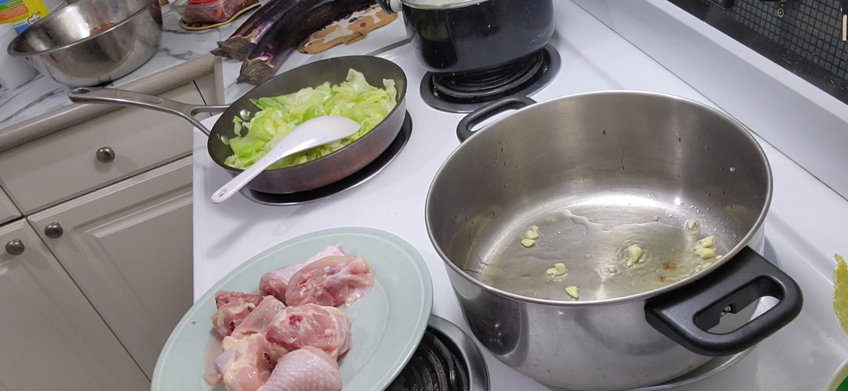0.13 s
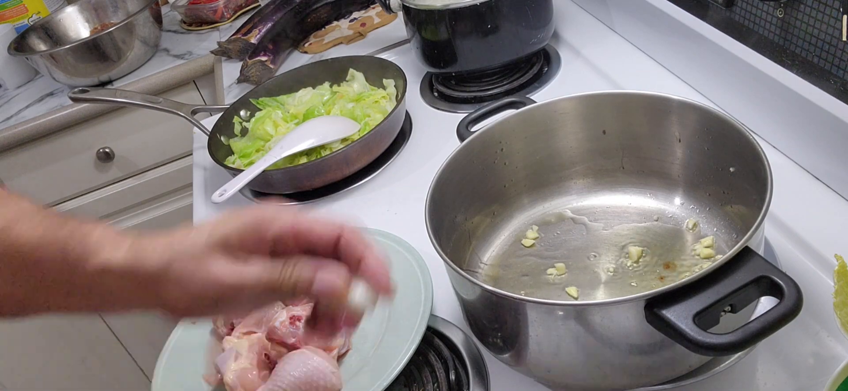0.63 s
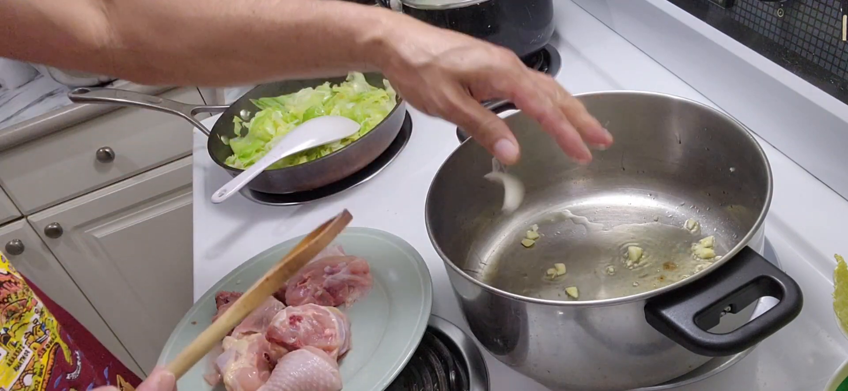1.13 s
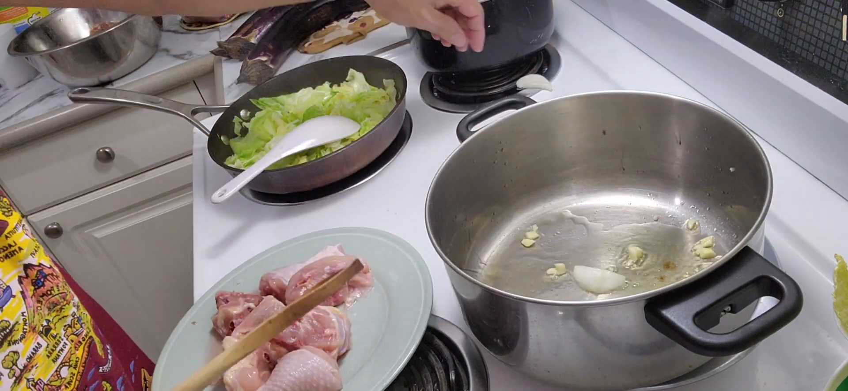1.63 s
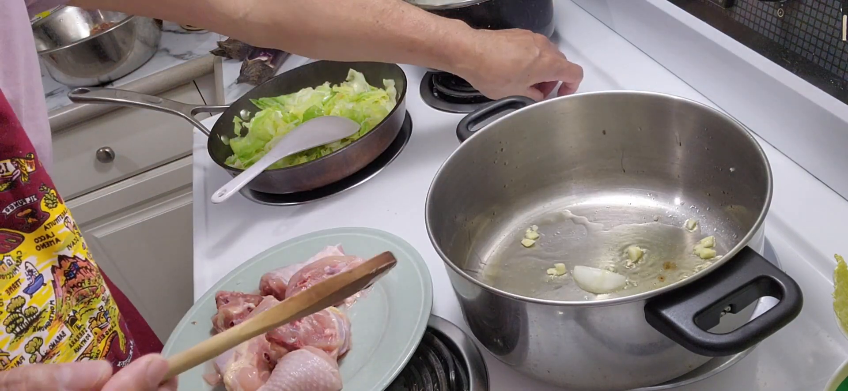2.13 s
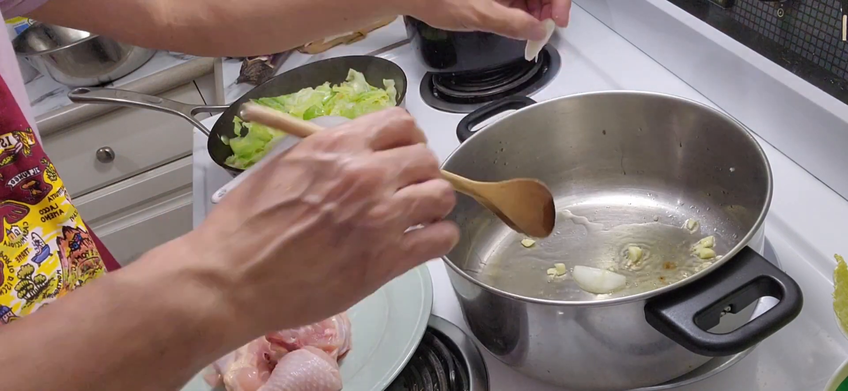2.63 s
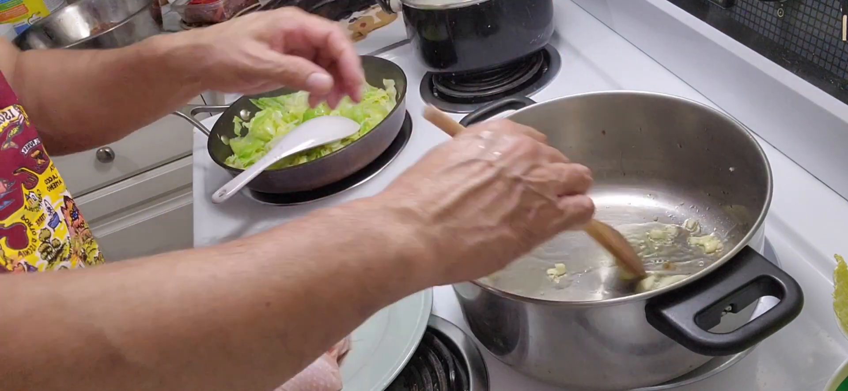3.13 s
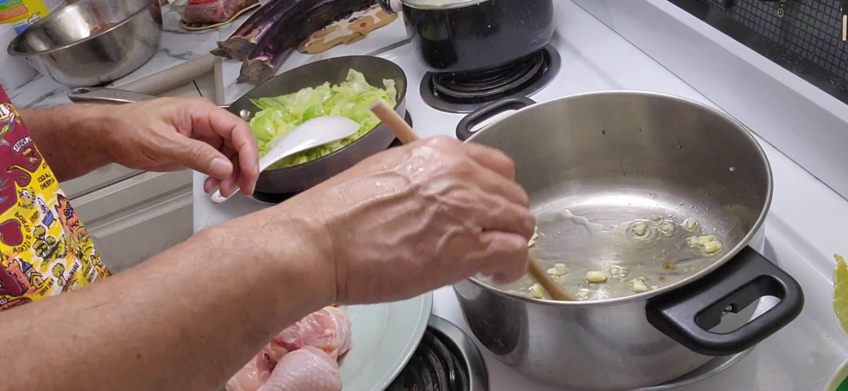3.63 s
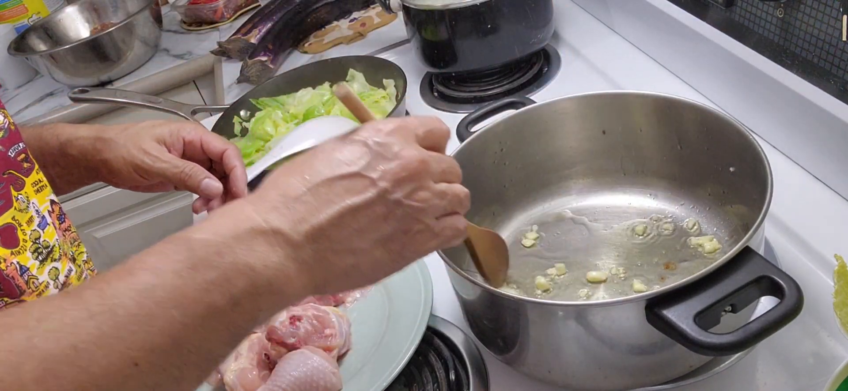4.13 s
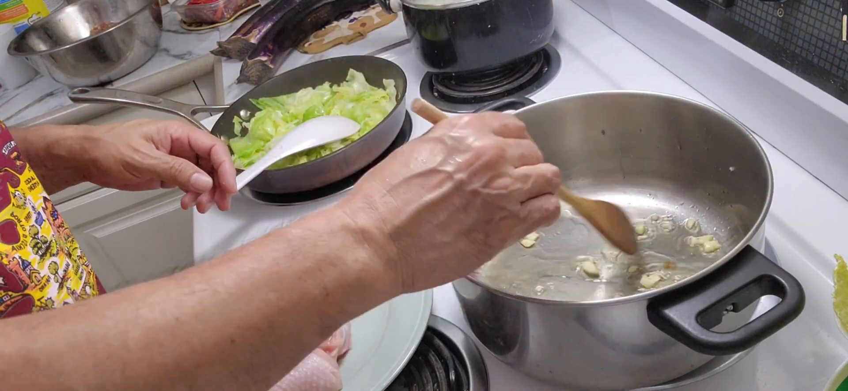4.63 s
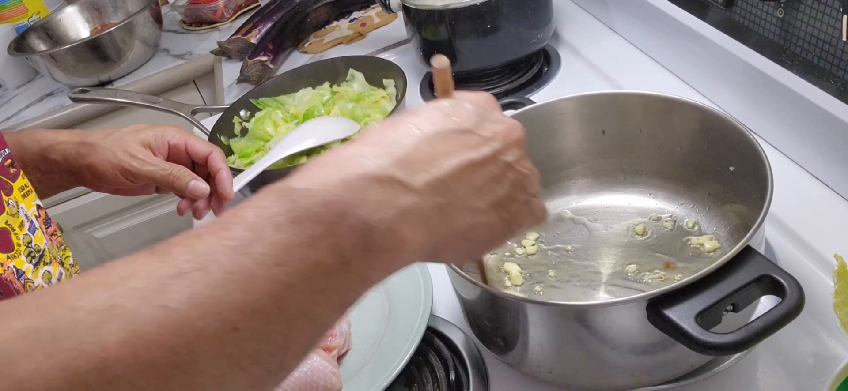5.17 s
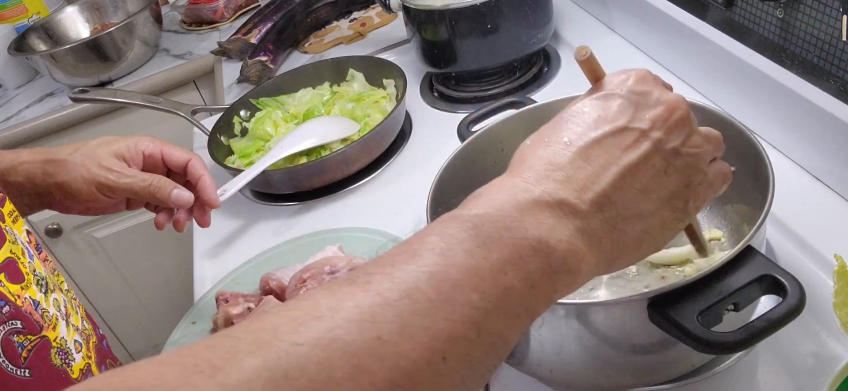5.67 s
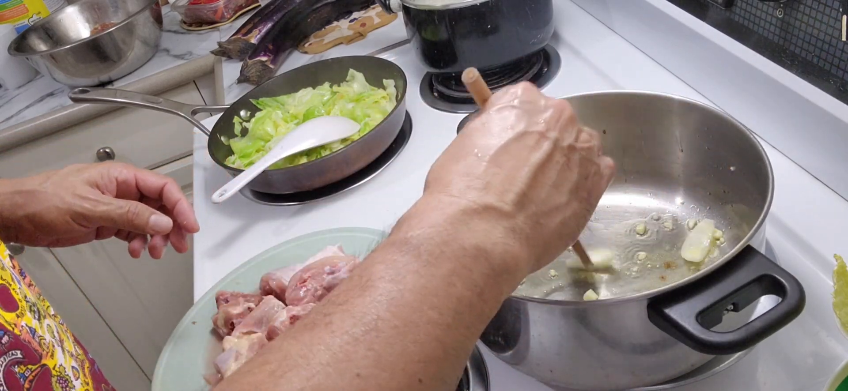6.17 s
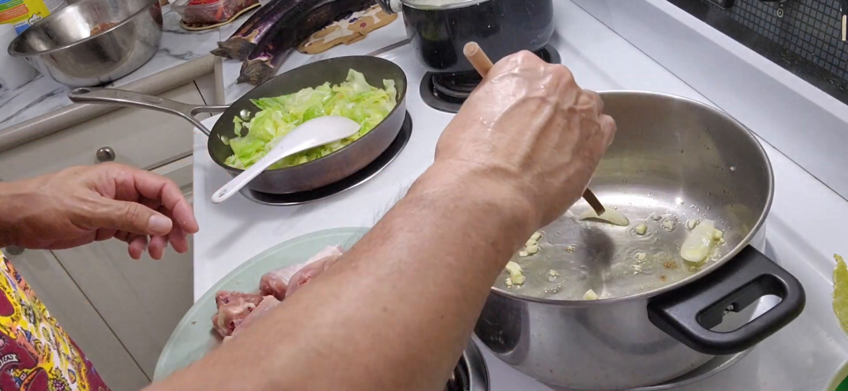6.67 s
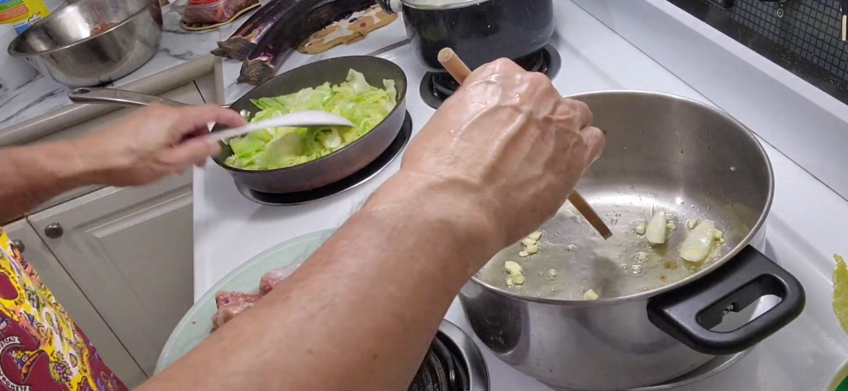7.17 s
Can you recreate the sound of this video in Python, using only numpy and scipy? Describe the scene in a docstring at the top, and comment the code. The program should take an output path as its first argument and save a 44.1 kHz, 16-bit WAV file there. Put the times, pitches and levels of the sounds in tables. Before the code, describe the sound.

Garlic sizzles in hot oil, thinly at first, with water drops cracking and small bubbles pinging. Soft low thuds open the scene. The fizz then grows dense and bright, and a faint low engine drone rises outside and stops. Irregular wooden spoon taps and scrapes follow on the hollow metal pot bottom. Close, dry indoor sound with slight room reflections and steady low hum.

```python
"""Chopped garlic fries in hot oil in a wide steel pot, over the kitchen's rumble and a wavering motor hum.
A few dull bumps ring low at the start; drops of water burst throughout with a crack and a short splutter,
and a few early bubbles sing. The fizz, shaped noise, then grows, and an engine passes outside as two sines.
From 3 s a wooden spoon knocks and scrapes the pot floor, whose damped modes ring briefly, and a few more
dull bumps follow."""
import sys
import numpy as np
from scipy import signal
from scipy.fft import rfft, irfft, next_fast_len
from scipy.io import wavfile

SR = 44100
rng = np.random.default_rng(int(sys.argv[2]) if len(sys.argv) > 2 else 0)


def persist_wave(psi):
    """Save psi, clipped to +-1, as 16-bit WAV."""
    counts = np.round(np.clip(psi, -1, 1) * 32767).astype(np.int16)
    wavfile.write(sys.argv[1], SR, np.atleast_2d(counts).T)


def invert_db(x):
    """Field ratio 10**(x/20) for x, a level in decibels (scalar or array-like)."""
    u = np.asarray(x, float) / 20
    return 10 ** u


N = 321489

# Blows of the spoon on the pot: (time [s], blow level [dB], then against the blow: wood knock [dB],
# second ring [dB], ring near 2200 Hz [dB])
SPOON_TAPS = [(2.9957, -30, -1, -2, -1), (3.136, -15, -0.5, -3.5, -15), (3.146, -18.5, -1, -5, -20),
              (3.201, -48, -5, 15, -4), (3.4004, -6.5, -11, 4, 1), (3.428, -34.5, 15, 20.5, -7),
              (3.7029, -21.5, -7, 1.5, 0), (3.7381, -24.5, 3.5, -7, -3), (3.8593, -22, -6, -7, -6),
              (3.9988, -43.5, 4, 15.5, 9), (4.258, -1.5, -21, -1.5, -17), (4.4283, -30, -3, 10, 7),
              (4.6005, -17.5, -11.5, -6, -17), (4.873, -17.5, -0.5, -2.5, -10),
              (5.1215, -32.5, -17, 2, 11.5), (5.387, -44, -10, -9, 20), (5.258, -21.5, -10, -24, -18),
              (5.3383, -19, -16, -2.5, -2), (5.3595, -22.5, -6, -17, -16), (5.546, -4.5, -11, -3, -10.5),
              (5.6232, -18, -10, -12, -9), (5.887, -22, -6, 6, -8), (5.901, -14.5, -5, -10, -16),
              (6.333, -4.5, -10.5, -7, -11), (6.755, -34.5, 5, 9, 2), (6.863, -6.5, -14, 1.5, -6),
              (7.131, -31, -17, -3, -6)]
LEFT_LATE_MS = .04   # mean delay of the left side


def rms_one(x):
    """Normalise to unit root-mean-square value."""
    return x / np.sqrt(np.mean(x ** 2) + 1e-20)


def in_time(rows):
    """Linear interpolation of each column of a time curve at every sample."""
    s, *columns = np.transpose(rows)
    return [np.interp(np.arange(N) / SR, s, c) for c in columns]


def at_hz(points, hz):
    """Interpolation of a spectrum on a logarithmic frequency axis."""
    return np.interp(np.log(hz), np.log(np.array(points)[:, 0]), np.array(points)[:, 1])


def drift(rate):
    """Slow random modulation of rms 1: white noise through two equal low-pass poles at rate [Hz]."""
    r = np.exp(-80 * np.pi * rate / SR)   # one step is 40 samples
    noise = rng.standard_normal(N // 40 + 2002)
    slow = signal.lfilter([1], [1, -2 * r, r * r], noise)[2000:]   # without the settling of the filter
    return np.interp(np.arange(N) / 40, np.arange(len(slow)), rms_one(slow))


def clicks(times, sizes):
    """Impulse train: single samples of given heights."""
    out = np.full(N, 1e-18)
    np.add.at(out, (np.asarray(times) * SR).astype(int), sizes)
    return out


def fade(x, t60):
    """Exponential decay: every impulse leaves a tail that falls by 60 dB in t60 [s]."""
    return signal.lfilter([1], [1, -invert_db(-60 / (t60 * SR))], x)


def ring(x, hz, t60):
    """Damped resonator: a unit impulse excites a decaying sine of initial height 1."""
    r = invert_db(-60 / (t60 * SR))
    w = 2 * np.pi * hz / SR
    return signal.lfilter([0, np.sin(w)], [1, -2 * r * np.cos(w), r * r], x)


def later(x, ms):
    """Propagation delay by interpolated reading."""
    return np.interp(np.arange(N) - ms * SR / 1000, np.arange(N), x)


def bank(edges, source):
    """Filter-bank synthesis: source(hz) gives noise height and ticks; each band is partly correlated in stereo."""
    # Stereo likeness: (frequency [Hz], left-right correlation)
    likeness_curve = [(60, .99), (120, .97), (200, .76), (380, .78), (700, .5), (1400, .3), (4400, .15),
                      (8000, 0)]
    # Stereo balance: (frequency [Hz], left over right [dB])
    balance_curve = [(60, 3.5), (150, -1), (380, 2.5), (950, 2.5), (2380, 1), (5980, 2.5), (15000, 3)]
    out, white = 0, rng.standard_normal((2, 2, N))
    for k, (low, high) in enumerate(zip(edges, edges[1:])):
        hz = np.sqrt(low * high)
        height, ticks = source(hz)
        sos = signal.butter(2, [low, high], "band", fs=SR, output="sos")
        alike = np.clip(at_hz(likeness_curve, hz), -1, 1)
        mid, side = white[k % 2] * height
        pair = np.sqrt(1 + alike) * mid + np.sqrt(1 - alike) * side * [[1], [-1]]
        pair = pair + (-1) ** k * ticks
        balance = invert_db(at_hz(balance_curve, hz) * np.array([[.5], [-.5]]))
        out = out + signal.sosfilt(sos, pair) * balance
    return out


def kitchen_air():
    """Ambient noise: band-shaped rumble of the house plus motor-hum sines, modulated in frequency and level."""
    # Rumble level: (time [s], level [dB])
    room_levels = [(0.0, -40), (0.34, -46.5), (0.65, -46.5), (2.54, -45), (3.17, -45.5), (3.51, -46),
                   (7.29, -44.5)]
    # Rumble spectrum: (frequency [Hz], relative level [dB])
    rumble_spectrum = [(12, -36), (20, 5.5), (114, 0), (170, -10), (494, -14), (649, -79), (1050, -71),
                       (1170, -15), (1470, -44), (1810, -37), (2150, -21), (2540, -34), (3000, -22),
                       (3900, -52), (6600, -120)]
    # Motor hum: (frequency [Hz], level [dB])
    hum_lines = [(59.2, -48.5), (119, -51.5)]
    level_db, = in_time(room_levels)

    def band(hz):
        """Noise height of one rumble band under slow random modulation."""
        return invert_db(at_hz(rumble_spectrum, hz) + 1.5 * drift(4.0)), 0

    rumble = bank(np.geomspace(20, 3000, 15), band)
    waver = np.cumsum(1 + 0.012 * drift(2.46)) / SR   # time that runs unevenly
    hum = 0
    for hz, db in hum_lines:
        hum = hum + np.sqrt(2) * invert_db(db + 0.92 * drift(2.4)) * np.sin(2 * np.pi * hz * waver)
    return invert_db(level_db) * rms_one(rumble) + hum


def frying():
    """Superposition of countless bubbles: noise fizz, a patter of spits, and bursts with splutter and puff."""
    # Vigour of the fizz: (time [s], level [dB])
    fry_levels = [(0.0, -44.5), (1.13, -47), (1.4, -37.5), (1.56, -31), (2.25, -31.5), (2.66, -35.5),
                  (2.95, -26.5), (3.31, -32.5), (3.74, -25), (3.92, -30), (4.53, -30.5), (4.97, -34),
                  (5.55, -29), (6.06, -32), (6.23, -29.5), (6.54, -26), (6.98, -27), (7.29, -37)]
    # Colour of fizz, spits, splutter and puffs: (frequency [Hz], relative level [dB])
    fizz_spectrum = [(710, -51), (1200, 2.5), (1490, -45.5), (1890, -5), (2090, -7.5), (2620, -19),
                     (3220, -6.5), (4650, -5), (5470, -3), (7740, -2), (8440, -8), (15200, 2.5),
                     (16000, 2.5)]
    # Top octave against the fizz: (time [s], relative level [dB])
    top_levels = [(0.0, -3), (1.13, -5.5), (1.5, -6.5), (6.2, -4.5), (6.54, -2), (6.98, -4), (7.29, 1.5)]
    splutter_level_db, swell_s = -63, 0.006   # the splutter begins to swell just before the snap
    puff_level_db, puff_t60_s = -12.5, 0.046   # short puff of steam at each snap, against the snap
    (fizz_db,), (top_db,) = in_time(fry_levels), in_time(top_levels)
    s, snap_db, peak_db, bright_db, bubble_hz = cracks()
    spits = small_bursts(200, 4.4)
    spit_hz = 5500 * 2 ** (.7 * rng.standard_normal(N))   # each spit has its own colour
    lean_db = 1.0 * rng.standard_normal(N) * [[.5], [-.5]]
    spit_sides = spits * rng.choice([-1, 1], N) * invert_db(lean_db)
    surge_db = .8 * drift(10.0)
    fits = fade(small_bursts(300.0, 2.4), 0.005) + 1.6   # a splutter is a quick run of tiny bursts

    def band(hz):
        """Noise height and spit impulses in one band, by addition of powers."""
        top = np.clip(np.log2(hz / 6500) * 4.0, 0, 1)   # share of the top octave's own level
        fizz = invert_db(fizz_db + top * top_db + surge_db + 1.3 * drift(20.0))
        pitch_db = 5 * np.exp(-(np.log2(hz / bubble_hz) / 0.15) ** 2)   # each bubble favours its own pitch
        burst_db = splutter_level_db + peak_db + top * bright_db + pitch_db
        burst_db = burst_db + 2.0 * rng.standard_normal(len(s))
        splutter = fade(fade(clicks(s - swell_s, invert_db(burst_db)), 0.023), 0.2) * fits
        colour = np.exp(-(np.log2(hz / spit_hz) / .55) ** 2)
        spit_tails = invert_db(-6.0) * fade(spits * colour, 0.045)
        puff_db = snap_db + puff_level_db + .5 * top * bright_db + 2 * pitch_db
        puff = fade(clicks(s, invert_db(puff_db)), puff_t60_s)
        height = np.sqrt(fizz ** 2 * (1 + spit_tails ** 2) + splutter ** 2 + puff ** 2)
        ticks = invert_db(15.5) * fizz * spit_sides * colour
        gain = invert_db(at_hz(fizz_spectrum, hz))
        return gain * height, gain * ticks

    sizzle = bank(np.geomspace(1200, 17500, 17), band)
    return sizzle + snaps(*crowded(s, snap_db, bright_db)) + pings()


def small_bursts(per_s, spread_db):
    """Clustered random process: spits come in clumps, and a few are much larger than the rest."""
    born = rng.random(N) < per_s * invert_db(4.0 * drift(6.0)) / SR
    return born * invert_db(spread_db * np.minimum(rng.exponential(1, N), 4))


def bumps():
    """Impact response: soft blows through floor and counter excite a low damped mode and a dull noise rattle."""
    # Dull bumps: (time [s], blow level [dB], pitch [Hz], decay t60 [s], rattle against the blow [dB])
    bump_list = [(.002, -25.5, 113, 0.054, 4), (0.122, -17.5, 80.5, 0.057, 8.5),
                 (0.151, -15.5, 253, 0.0075, -3), (0.164, -24, 100.5, 0.063, -18),
                 (1.069, -30, 318, 0.041, 5), (1.075, -36.5, 140, 0.21, 17), (5.349, -28, 285, 0.013, 4),
                 (5.635, -30, 304, 0.025, 3)]
    out, puff = np.zeros(N), rng.standard_normal(N)
    dull = signal.butter(1, [130.0, 1700.0], "band", fs=SR, output="sos")
    for s, peak_db, hz, t60, rattle_db in bump_list:
        hit = clicks([s], invert_db(peak_db))
        out += ring(hit + 0.091 * puff * fade(hit, 0.22), hz, t60)
        out += invert_db(rattle_db) * 0.32 * signal.sosfilt(dull, puff * fade(hit, 0.096))
    return out


def walls(x, t60, cut_hz):
    """Reverberation by recirculating delays, six a side, low-passed on every round."""
    size = next_fast_len(N + SR)
    hz = np.arange(size // 2 + 1) * SR / size
    spectrum, out = rfft(x, size), np.zeros((2, N))
    for k, lag in enumerate(rng.uniform(0.0067, 0.02, 12)):
        loop = invert_db(-60 * lag / t60) * np.exp(-2j * np.pi * hz * lag) / (1 + 1j * hz / cut_hz)
        out[k % 2] += irfft(spectrum * loop / (1 - loop), size)[:N] * (-1) ** (k // 2)
    return out


def cracks():
    """Burst excitation, drops and taps: time [s], snap, splutter and top octave [dB], favoured pitch [Hz]."""
    # Bursting water drops: (time [s], snap level [dB], relative splutter level [dB],
    # its top octave against it [dB])
    burst_list = [(0.0263, -22.5, -22, 1), (0.12, -24, -33, -20.5), (0.2648, -33, -25, -7),
                  (0.4555, -8.5, -18, -2), (0.64, -25.5, -18.5, -4), (0.7078, -12.5, -10.5, -11),
                  (0.7408, -9, -18, 7), (0.8034, -14, -14, -13), (1.051, -37, -15.5, -7),
                  (1.1948, -20, -20, -0.5), (1.4327, -11.5, -15, -3.5), (1.541, -18, -7.5, -10),
                  (1.605, -8.5, -5.5, -1), (1.654, -28, -9.5, -37), (1.696, -8.5, -2.5, -6),
                  (1.736, -9, -18, -21), (1.934, -18, -21, -11), (1.9723, -19, -12.5, 0),
                  (2, -10, -7.5, -6), (2.0227, -10, -15, -11), (2.075, -22, -17, -19),
                  (2.106, -17.5, -29, 0), (2.1519, -11.5, -13, -4), (2.213, -10.5, -22, -11),
                  (2.231, -13, -19, 5), (2.374, -26, -7.5, -2), (2.581, -16.5, -15, 1),
                  (2.877, -33, -6, -7), (3.0003, -12.5, -11, -5), (3.279, -13, -2.5, -6.5),
                  (3.3562, -17, -9, -7), (3.5271, -16, -5, -11), (3.567, -17, -14, -2),
                  (3.843, -6, 1.5, -14), (3.858, -13, -17, 6), (3.9332, -9, -3.5, -6),
                  (4.1434, -2, -2.5, -2), (4.398, -15, -25, -17), (4.413, -14, -4.5, -12),
                  (4.437, -26, -6.5, -7), (4.615, -17, -10, -4), (4.7318, -5, -2.5, -4),
                  (4.907, -10.5, -20, -3), (5.004, -32, -8, -4), (5.03, -15, -8, -13),
                  (5.145, -32, -29, -14), (5.173, -15.5, -10.5, -1), (5.195, -26, -11, -10),
                  (5.3248, -26, -5.5, -8), (5.448, -11, -12, -10), (5.6137, -17, -2, -5.5),
                  (5.6358, -10, -7.5, -11), (5.961, -28, -4.5, -5.5), (6.2615, -15, -28, -21),
                  (6.413, -15, -31, 12), (6.467, -12.5, -26, -23), (6.496, -22, -48, 8),
                  (6.552, -13.5, -16, 10), (6.62, -23, -6, 1.5), (6.753, -14, -1.5, -0.5),
                  (6.848, -10, -5, -4), (6.9016, -12.5, -37, 5), (6.984, -14, -35, -10),
                  (7.0368, -16, -3, -0.5), (7.07, -24, -6, 1), (7.124, -5, -3.5, -7), (7.133, -6, -32, 6),
                  (7.2423, -21, -15.5, 2), (7.255, -5, -12, 2)]
    s, snap_db, splutter_db, bright_db = np.transpose(burst_list)
    pitch = 5120 * 2 ** (0.26 * rng.standard_normal(len(s)))   # spread 0.26 octave
    # every tap also cracks and shakes the oil, dull on top and lower in pitch
    tap_s, tap_db = np.transpose(SPOON_TAPS)[:2]
    taps = tap_s, tap_db - 9, tap_db + 5, -11.5 + 0 * tap_s, 2800 + 0 * tap_s
    return np.hstack([[s, snap_db, splutter_db, bright_db, pitch], taps])


def crowded(s, snap_db, bright_db):
    """Clustering of transients: three lesser snaps crowd round each snap, most of them just after it."""
    after_s, after_db, after_spread_db = 0.032, -24, 6
    gaps, sizes = rng.uniform(-.4, 1.6, (len(s), 3)), rng.standard_normal((len(s), 3))
    near = np.clip(s[:, None] + after_s * gaps, 0, N / SR - .01)
    near_db = snap_db[:, None] + after_db + after_spread_db * sizes
    all_bright_db = np.append(bright_db, np.repeat(bright_db, 3))
    return np.append(s, near), np.append(snap_db, near_db), all_bright_db


def snaps(s, peak_db, bright_db):
    """Broadband impulses in four bands, each with random brightness and side, and a reflection off the pot wall."""
    chance, out = rng.standard_normal((len(s), 5)), np.zeros((2, N))
    for k, (low, high) in enumerate([(1500, 3000), (3000, 5400), (5400, 8200), (9500, 15800)]):
        sos = signal.butter(2, [low, high], "band", fs=SR, output="sos")
        band_db = [-4, 8.5, 13, 17 + .6 * bright_db][k]
        for side, lean in enumerate([.5, -.5]):
            side_db = lean * (2.5 + 2 * chance[:, -1])
            hits = clicks(s + .0007, invert_db(peak_db + band_db + 2.5 * chance[:, k] + side_db))
            echo = .6 * later(hits, 1.1 - .6 * side)   # sooner on the right
            out[side] += (-1) ** k * signal.sosfilt(sos, hits + echo)
    return np.array([later(out[0], LEFT_LATE_MS), out[1]])


def pings():
    """Bubble resonance: an impulse and a fading noise tail excite one damped mode at the bubble's pitch."""
    # Single bubbles that sing as they burst: (time [s], impulse level [dB], pitch [Hz])
    ping_list = [(0.1955, -32.5, 6420), (0.264, -30, 6060), (0.5414, -36, 7590), (0.6389, -35, 7800),
                 (1.049, -26.5, 7080), (1.5396, -24, 3390)]
    ring_t60_s, tail_db, tail_t60_s = 0.019, -18.5, 0.11
    out, grit = np.zeros((2, N)), rng.standard_normal((2, N))
    for s, peak_db, hz in ping_list:
        hit = clicks([s], invert_db(peak_db))
        out += ring(hit + invert_db(tail_db) * grit * fade(hit, tail_t60_s), hz, ring_t60_s)
    return out


def pot(fat):
    """Modal synthesis: knocks, rubbing and frying fat drive the same modes, each with its own stereo delay and pan."""
    # Modes of pot and spoon: (frequency [Hz], relative level [dB], resonator t60 [s])
    pot_modes = [(276.6, -15, 0.041), (521.6, -16, 0.074), (680, -8.5, 0.014), (846, -9, 0.035),
                 (1059.3, 2, 0.031), (1333, -4.5, 0.0052), (1486, -5.5, 0.054), (1609, -2.5, 0.016),
                 (1647, -20.5, 0.18), (1975, -10.5, 0.041), (2184, -6, 0.072), (2394, -7, 0.025),
                 (2530, -3, 0.023), (3054, 0.5, 0.055), (3250, 12, 0.014), (3970, 6.5, 0.029),
                 (4196, -2, 0.052), (5500, 18, 0.0051), (6590, -4, 0.0093)]
    # Rubbing and shaking of the pot: (time [s], level [dB])
    scrape_levels = [(0.9, -63.5), (1.2, -59.5), (1.4, -56), (1.57, -55.5), (2.62, -61), (2.88, -52),
                     (3.32, -48.5), (5.15, -54.5), (5.31, -44.5), (5.345, -28), (5.39, -51), (5.43, -51.5),
                     (5.605, -42.5), (5.63, -30.5), (5.68, -50.5), (5.79, -45.5), (6.0, -62), (6.43, -53),
                     (7.29, -53)]
    fat_shakes_db, main_rubbed_db = -44.5, -3   # rubbing wakes the main ring less than a blow does
    build_s, main_build_s = 0.0063, 0.035   # rings build up over the soft contact, the main one more slowly
    s, peak_db, knock_db, second_db, higher_db = np.transpose(SPOON_TAPS)
    rub_db, = in_time(scrape_levels)
    slip_now = rng.random(N) < 900.0 / SR   # 900 slips a second on average
    slips = slip_now * rng.standard_normal(N) * invert_db(rub_db + 5 * np.clip(drift(25.0), -3, 1.5))
    soft = signal.butter(2, 2200, fs=SR, output="sos")
    slips = signal.sosfilt(soft, slips + invert_db(fat_shakes_db) * fat)
    chance = rng.standard_normal((len(s), len(pot_modes)))
    grit, out = rng.standard_normal((2, N)), np.zeros((2, N))
    lag_ms = LEFT_LATE_MS + .07 * rng.standard_normal(len(pot_modes))
    pan_db = 1 + 2.5 * rng.standard_normal(len(pot_modes))
    top_db = -17 + .5 * peak_db   # rings above 2500 Hz wake mostly in hard blows
    groups = [knock_db, 0, second_db, higher_db, top_db]
    for k, (hz, level_db, t60) in enumerate(pot_modes):
        main = 950 < hz < 1250
        group_db = groups[np.searchsorted([950, 1250, 1800, 2500], hz)]
        spread_db = 4.5 if hz > 1800 else 1.8
        blows = clicks(s, invert_db(peak_db + group_db + spread_db * chance[:, k]))
        chatter = invert_db(-31.0) * grit[k % 2] * fade(blows, 0.08)   # wood skids on after the blow
        rubbing = slips * invert_db(main_rubbed_db * main)
        tone = ring(invert_db(level_db) * (blows + chatter + rubbing), hz, t60)
        # a second resonator at the same pitch makes the ring swell
        build = main_build_s if main else build_s
        tone = ring(tone, hz, build) * np.log(1000) * 2 / (build * SR)
        pan = invert_db(pan_db[k] * np.array([[.5], [-.5]]))
        out += (-1) ** ((k + 1) // 2) * np.array([later(tone, lag_ms[k]), tone]) * pan
    return out


def engine():
    """Harmonic orders of rotation: a low order rises overall, then stops; a resonance brings out the third."""
    # First order: (time [s], frequency [Hz], level [dB])
    engine_track = [(2.1, 69.4, -47), (2.186, 66.1, -53.5), (3.156, 82, -33), (3.358, 83.7, -36.5),
                    (3.45, 80.4, -46)]
    resonance_hz, width_hz, third_db = 223.6, 6.1, -8.5
    hz, first_db = in_time(engine_track)
    t, turn = np.arange(N) / SR, 2 * np.pi * np.cumsum(hz) / SR
    fade_in = np.clip((t - engine_track[0][0]) / 0.12, 0, 1)
    fade_out = np.clip((engine_track[-1][0] - t) / 0.06, 0, 1)
    third = invert_db(third_db) * np.exp(-((3 * hz - resonance_hz) / width_hz) ** 2)
    return np.sqrt(2) * fade_in * fade_out * invert_db(first_db) * (np.sin(turn) + third * np.sin(3 * turn))


def scene():
    """Linear superposition of all sources; the pot's right side and the bumps also reverberate."""
    fat, low = frying(), bumps()
    steel = pot(fat[0] + fat[1])
    reverberation = invert_db(-15) * walls(steel[1] + low, 0.19, 12000)
    return fat + steel + reverberation + low + engine() + kitchen_air()


def low_pass(x):
    """Removes everything above the highest recorded frequency."""
    return signal.sosfilt(signal.butter(12, 17030, fs=SR, output="sos"), x)


def record(dry):
    """Band limiting and saturation: the deepest bass is lost, peaks are rounded, the top is cut."""
    thin = signal.sosfilt(signal.butter(2, 46.0, "high", fs=SR, output="sos"), dry)
    rounded = 1.3 * np.tanh(thin / 1.3)
    cut = signal.sosfilt(signal.ellip(10, .5, 30, 15850, fs=SR, output="sos"), rounded)
    return low_pass(np.clip(cut, -1, 1))


dry = scene()
out = record(dry)
persist_wave(out)
```